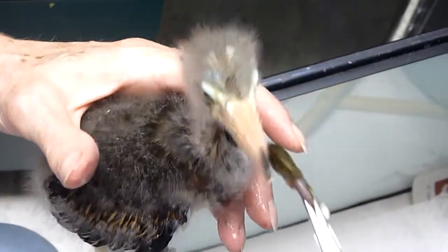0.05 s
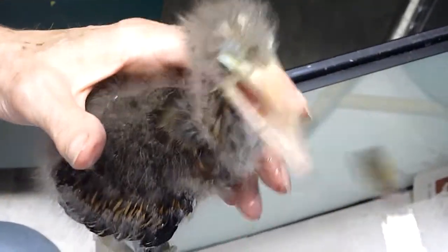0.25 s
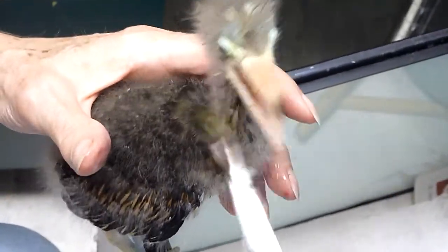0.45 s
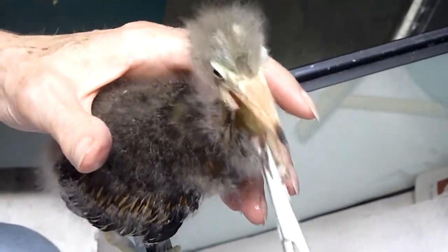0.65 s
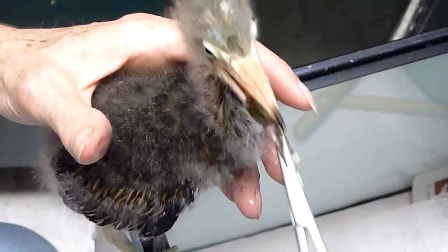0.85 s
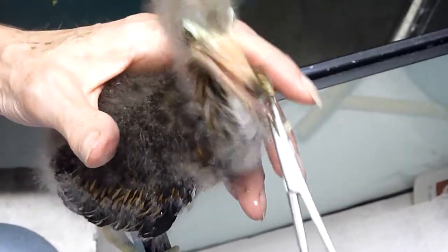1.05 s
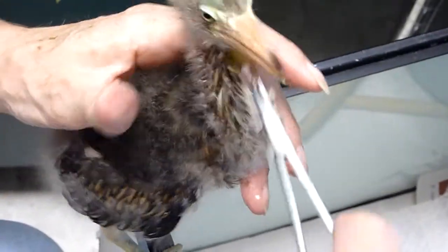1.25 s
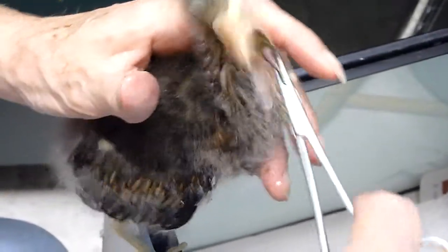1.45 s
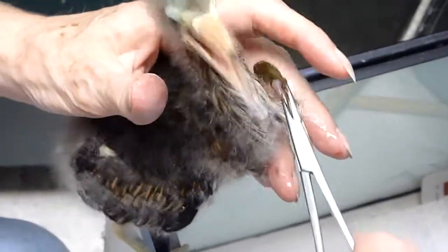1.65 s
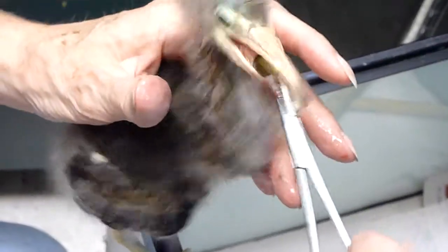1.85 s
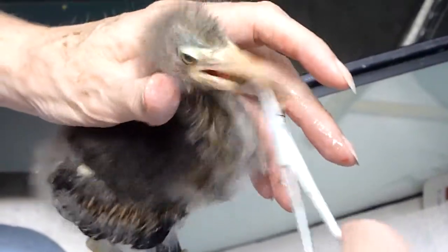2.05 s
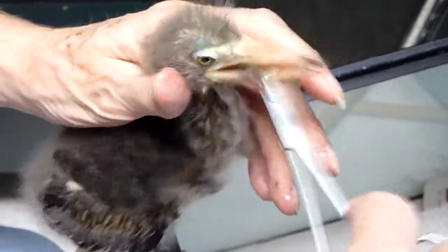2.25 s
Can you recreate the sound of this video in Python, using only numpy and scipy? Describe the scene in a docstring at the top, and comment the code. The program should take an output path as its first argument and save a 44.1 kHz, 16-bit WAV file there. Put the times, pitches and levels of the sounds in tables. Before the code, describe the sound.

Harsh begging squawks from a young bird in a small room, with chirps and whistles around.

```python
"""A heron chick, held in the hand and fed in a small hard room, begs with harsh, unpitched squawks.
Each is a rasp of uneven pulses and air through its throat, with a resonance (a boosted band of sound)
that sinks during the call. Other birds chirp and whistle around it, the hand knocks softly and rustles
the chick's down, and a fan hums behind it all. The recorder cuts off the highest treble."""
import sys
import numpy as np
from scipy import signal
from scipy.fft import rfft, irfft, next_fast_len
from scipy.io import wavfile
from scipy.ndimage import uniform_filter1d, map_coordinates

SR = 44100
rng = np.random.default_rng(int(sys.argv[2]) if len(sys.argv) > 2 else 0)


def log_audio(samples):
    """Write samples as a 16-bit WAV file to the path given in sys.argv[1]."""
    # one column per channel
    frames = np.atleast_2d(samples).T
    # limit to full scale, then quantise
    limited = np.clip(frames, -1, 1)
    pcm = np.round(limited * 32767).astype(np.int16)
    wavfile.write(sys.argv[1], SR, pcm)


N = 101429
T = np.arange(N) / SR

# Squawks: start/s, length/s, level/dB, rise/s, first resonance/Hz, time until half sunk/s, open beak/0-1
SQUAWKS = [(0.606, 0.1, -16.5, .038, 5140, 0.047, 0.16), (0.723, 0.063, -17.5, 0.02, 4400, 0.014, 0),
           (1.124, 0.21, -18.5, 0.044, 5360, 0.041, 0), (1.591, 0.17, -15.5, .038, 5640, 0.061, 0.16),
           (1.898, 0.12, -17, 0.031, 6020, 0.15, 0.78)]
# The tone colour of the throat: f/Hz, level/dB
THROAT_COLOUR = [(120, -41.5), (330, -16), (700, -12), (1050, -2.5), (1650, -5), (2250, 2.5), (2900, -1.5),
                 (3900, -5), (4900, -4.5), (5800, -4), (6900, -0.5), (7600, -5)]
# What a wide open beak adds to that colour: f/Hz, level/dB
OPEN_BEAK_COLOUR = [(700, 4.5), (1300, 5), (2300, -2), (3200, -8), (4100, 5), (4800, 10.5), (6100, 3),
                    (7100, 0)]
# Narrow, steady resonances of the bird and its tank: f/Hz, half width/Hz, boost/dB
RESONANCES = [(350, 50, 9), (890, 50, 8), (1430, 90, 6), (2110, 90, 9), (2540, 50, 9), (2760, 45, 6),
              (3070, 55, 8), (3330, 55, 10), (3930, 110, 6), (4270, 110, 8), (4650, 70, 5), (5050, 50, 5),
              (5410, 85, 9), (6380, 90, 7)]
BEAK_END_HZ, BEAK_HALF_WIDTH_HZ, BEAK_DB, SINK_S = 4145, 530, 12.5, 0.0088  # the sinking resonance
OPEN_DAMPING = 0.38  # a wide open beak weakens it by this share
JUDDER_DB, SAG_DB_PER_S, RELEASE_DB_PER_S = 1.6, 20.5, 517

def heron():
    """Each squawk swells, judders and stops while its resonance sinks; an open beak brightens it."""
    source = filtered(rasp(), lambda f: amp(sum(resonance(f, *row) for row in RESONANCES)))
    hz, t, spectrum = signal.stft(source, SR, nperseg=512)
    hz = hz[:, None]
    spectrum *= amp(shifting_bands(spectrum.shape))
    out = np.zeros(N)
    for start, length, db, rise, first_hz, sink, opening in SQUAWKS:
        centre = BEAK_END_HZ + (first_hz - BEAK_END_HZ) * (1 - np.tanh((t - start - sink) / SINK_S)) / 2
        beak = resonance(hz, centre, BEAK_HALF_WIDTH_HZ, BEAK_DB * (1 - OPEN_DAMPING * opening))
        colour = along(THROAT_COLOUR, hz) + opening * along(OPEN_BEAK_COLOUR, hz) + beak
        voice = signal.istft(spectrum * amp(colour), SR, nperseg=512)[1][:N]
        voice *= amp(JUDDER_DB * wobble(220))
        voice /= voice[(T > start) & (T < start + length)].std()
        age = np.maximum(T - start, 0)
        swell = np.sin(np.pi / 2 * np.minimum(age / rise, 1)) ** 2
        fade_db = SAG_DB_PER_S * age + RELEASE_DB_PER_S * np.maximum(age - length, 0)
        out += voice * swell * amp(db - fade_db)
    return out


def rasp(pulse_hz=400.6, gap_scatter=0.3, size_scatter_db=2, air_db=2, flutter_db=0.82):
    """The syrinx, a bird's voice box, makes uneven pulses mixed with fluttering air."""
    gaps, sizes = rng.standard_normal((2, N // 16))
    at = (np.cumsum(np.exp(gap_scatter * gaps)) / pulse_hz * SR).astype(int)
    pulses = np.bincount(at[at < N], amp(size_scatter_db * sizes[at < N]), N)
    air = amp(air_db) * rng.standard_normal(N)
    return unit((unit(pulses - pulses.mean()) + air) * amp(flutter_db * wobble(160)))


def shifting_bands(shape, depth_db=3.2):
    """Narrow bands of the rasp slowly grow louder and softer at random (in dB)."""
    bands = uniform_filter1d(rng.standard_normal(shape), axis=0, size=2)
    return depth_db * unit(uniform_filter1d(bands, axis=1, size=18))


# Chirps: start/s, length/s, first f/Hz, middle f/Hz, last f/Hz, level/dB, roughness/0-1,
# overtone/dB, left minus right/dB
CHIRPS = [(0.112, 0.12, 4750, 4220, 4320, -56.5, 0.45, -34.5, 8),
          (0.23, .022, 3900, 4200, 5060, -30, 0.79, -28.5, -7.5),
          (0.234, 0.026, 6540, 6600, 6530, -25.5, 0.5, -34, -6),
          (.244, 0.027, 4920, 5886, 4950, -11, 0.36, -46, -4.5),
          (0.267, 0.0267, 4870, 4050, 3560, -17, 0.23, -43, -4.5),
          (0.273, 0.035, 6100, 5850, 5380, -24, 0.58, -30, 1),
          (0.313, .034, 3406, 4047, 4600, -15.5, 0.3, -43, -2.5),
          (0.586, 0.036, 3500, 4090, 5020, -31.5, 0.3, -15, 3),
          (0.626, 0.029, 5196, 4910, 4360, -21, .8, -26, -5),
          (0.818, 0.032, 1750, 2240, 2740, -19.5, 0.11, -33, 2),
          (0.849, .034, 2700, 2624, 2065, -14.5, 0.11, -19, 2.5),
          (0.874, .03, 2250, 1898, 1343, -25, 0.14, -25, 0.5),
          (0.86, 0.051, 4100, 3702, 2830, -30.5, .7, -14, 0.5),
          (0.994, 0.015, 5170, 5290, 5730, -28.5, 0.2, -38, -4),
          (1.836, 0.087, 4500, 4200, 3730, -43, 0.85, -11, 3.5),
          (2.292, 0.016, 5255, 5580, 5870, -27.5, 0.44, -36, -7.5)]

def chirps(fade_share=0.29, rough_rate=1400, scatter_hz=590):
    """Other birds sing short gliding notes; fast shakes of pitch and level make some raspy."""
    out = np.zeros((2, N))
    for start, length, first, middle, last, db, rough, overtone_db, left_db in CHIRPS:
        u = np.clip((T - start) / length, 0, 1)  # runs from 0 to 1 through the note
        pitch = first + (last - first) * u + (2 * middle - first - last) * 2 * u * (1 - u)
        phase = 2 * np.pi * np.cumsum(pitch + rough * scatter_hz * wobble(rough_rate)) / SR
        tone = np.sin(phase) + amp(overtone_db) * np.sin(2 * phase)
        fade = np.sin(np.pi / 2 * np.minimum(np.minimum(u, 1 - u) / fade_share, 1))
        out += pan(left_db) * amp(db) * fade * unit(tone * (1 + rough * wobble(rough_rate)))
    return out


# A near, pulsing whistle: t/s, f/Hz, level/dB
NEAR_WHISTLE = [(1.03, 6200, -46), (1.056, 6540, -15.5), (1.065, 6620, -10.5), (1.077, 6460, -46),
                (1.085, 6420, -8), (1.098, 6290, -26), (1.106, 6270, -11), (1.126, 6210, -26.5),
                (1.14, 6006, -7.5), (1.152, 5914, -28), (1.174, 5760, -12), (1.2, 5595, -18),
                (1.235, 5300, -41.5)]
# A thin, far whistle: t/s, f/Hz, level/dB
FAR_WHISTLE = [(.41, 5460, -51), (.47, 5100, -43.5), (.54, 5040, -42.5), (.61, 5050, -44)]

def whistle(curve, tremble_hz=35, tremble_db=2):
    """A bird holds one pure, sliding tone that trembles slightly."""
    times, pitch, db = np.transpose(curve)
    phase = 2 * np.pi * np.cumsum(np.interp(T, times, pitch) + tremble_hz * wobble(150)) / SR
    singing = (T > times[0]) & (T < times[-1])
    level = singing * amp(np.interp(T, times, db) + tremble_db * wobble(110))
    return uniform_filter1d(level, size=130) * unit(np.sin(phase))


# Soft knocks of the hand: t/s, level/dB, f/Hz
KNOCKS = [(.25, -37, 594), (0.265, -35, 1100), (2.286, -28.5, 288)]
# Rustles of down: middle/s, half length/s, level/dB
RUSTLES = [(0.529, 0.12, -40.5), (2.256, .04, -52)]
# Their tone colour: f/Hz, level/dB
RUSTLE_COLOUR = [(100, -1), (500, 6.5), (1100, 1), (2300, -6.5), (4500, -10), (7500, -17.5)]

def handling(knock_rise_s=0.00033, knock_ring_s=0.04):
    """Holding the chick makes dull knocks and rustles its soft feathers."""
    out = np.zeros(N)
    for start, db, hz in KNOCKS:
        age = np.maximum(T - start, 0)
        dull_noise = noise([(hz / 4, -15), (hz, 0), (2 * hz, -8), (7000, -35)])
        thud = np.sin(2 * np.pi * hz * age) + amp(-0.5) * dull_noise
        out += thud * np.minimum(age / knock_rise_s, 1) * amp(db - 60 * age / knock_ring_s)
    for middle, half, db in RUSTLES:
        swell = np.exp(-((T - middle) / half) ** 2)
        out += noise(RUSTLE_COLOUR) * amp(db + 3.1 * wobble(87.5)) * swell
    return out


# The tone colour of the fan's air: f/Hz, level/dB
FAN_COLOUR = [(15, -48.5), (25, -12.5), (98, -5), (231, -6.5), (280, -4), (431, -3.5), (522, -9), (617, -4),
              (802, -9.5), (1070, -13.5), (2300, -18.5), (2650, -17.5), (3980, -23), (5840, -20),
              (7600, -33), (9880, -79.5), (16700, -120)]
# The tones of its hum: f/Hz, level/dB
FAN_HUM = [(134.6, -60.5), (296.1, -57), (360.7, -56.5), (597.5, -54.5), (651.4, -63)]

def fan(air_db=-46.5, side_db=-46):
    """A fan blows steadily and hums with a few wavering tones."""
    mid = amp(air_db + 0.27 * wobble(12)) * noise(FAN_COLOUR)
    for hz, db in FAN_HUM:
        mid += amp(db) * unit(np.sin(2 * np.pi * hz * T + 1.1 * wobble(6.94)))
    # Both ears share mid; side sets them apart, mostly in the treble.
    side = amp(side_db) * filtered(noise(FAN_COLOUR), lambda hz: (hz + 750) / (hz + 3000))
    return np.array([mid + side, mid - side])


# How long the room rings: f/Hz, time to fade by 60 dB/s
ROOM_RING = [(200, 0.24), (2000, 0.24), (4500, 0.25), (8000, 0.19)]

def room(x, walls_db, tail_db, echo_spread_s=0.016, side_db=-3.5):
    """Close walls add quick echoes and a short ringing tail; high sounds spread wider than low ones."""
    hz, t, spectrum = signal.stft(rng.standard_normal((2, SR // 3)), SR, nperseg=256)
    tail = signal.istft(spectrum * amp(-60 * t / along(ROOM_RING, hz)[:, None]), SR, nperseg=256)[1]
    echoes = amp(tail_db) * tail / np.linalg.norm(tail[0])
    for when, mid_sign, side_sign in rng.uniform(-1, 1, size=(16, 3)):
        delay = int((abs(when) * echo_spread_s + .001) * SR)
        echoes[:, delay] += amp(walls_db) * np.sign([mid_sign, side_sign]) / np.sqrt(16)
    echoes[0, 0] += 1  # the direct sound
    echoes /= np.linalg.norm(echoes[0])
    mid, side = [signal.fftconvolve(x * np.ones((2, 1)), h[None], axes=1)[:, :N] for h in echoes]
    side = filtered(side, lambda f: amp(side_db) * (f + 200) / (f + 900))
    return mid + np.array([[1], [-1]]) * side


def amp(db):
    """Turn decibels into a number to multiply by."""
    return 10 ** (np.asarray(db) / 20)


def unit(x):
    """Scale a signal to an average power of 1."""
    return x / np.sqrt(np.mean(x ** 2) + 1e-20)


def along(points, hz):
    """Read between (Hz, value) points, with octaves evenly spaced."""
    f, values = np.transpose(points)
    return np.interp(np.log(hz + 1), np.log(f + 1), values)


def resonance(hz, centre, half_width, db):
    """A rounded boost around one frequency, in dB."""
    return db / (1 + ((hz - centre) / half_width) ** 2)


def wobble(rate):
    """A smooth curve through `rate` random values a second."""
    return map_coordinates(rng.standard_normal(N // 8), [T * rate], mode="wrap")


def filtered(x, response):
    """Multiply each frequency in x by response(Hz)."""
    size = next_fast_len(N + SR // 2)
    return irfft(rfft(x, size) * response(np.fft.rfftfreq(size, 1 / SR)), size)[..., :N]


def noise(colour):
    """Noise of power 1, shaped by (Hz, dB) points."""
    return unit(filtered(rng.standard_normal(N), lambda hz: amp(along(colour, hz))))


def pan(left_db):
    """Left and right gains, left_db apart."""
    return amp(np.array([[left_db], [-left_db]]) / 2)


def scene(left_lag_s=0.00003):
    """The heron close by, the other birds farther off in the same room, and the fan behind."""
    near = room(pan(left_db=-0.5) * (heron() + handling()), walls_db=-2, tail_db=-8)
    others = room(chirps(), walls_db=-7, tail_db=-4.5)
    tones = pan(left_db=-1.5) * (whistle(NEAR_WHISTLE) + whistle(FAR_WHISTLE))
    # The left ear hears the whistles a little later.
    tones = filtered(tones, lambda hz: np.exp(np.pi * 1j * hz * left_lag_s * np.array([[-1], [1]])))
    whistles = room(tones, walls_db=-12, tail_db=-13)
    return near + others + whistles + fan()


def record(dry, peak_limit=0.85, sampling_hz=16000, top_hz=10400):
    """Peaks are rounded off; a low sampling rate cuts the treble and mirrors it faintly above the cut."""
    rounded = dry / (1 + (dry / peak_limit) ** 6) ** (1 / 6)
    treble_cut = [(7000, 1), (7650, -11.5), (7950, -41.5), (8100, -100)]  # f/Hz, level/dB
    mirror_colour = [(8400, -5), (9000, -17.5), (9500, -26), (10000, -42.5), (10400, -66.5)]
    band = filtered(rounded, lambda hz: amp(along(treble_cut, hz)))
    mirror = 2 * band * np.cos(2 * np.pi * sampling_hz * T)
    mirror = filtered(mirror, lambda hz: amp(along(mirror_colour, hz)))
    return filtered(band + mirror, lambda hz: hz < top_hz)


dry = scene()
out = record(dry)
log_audio(out)
```